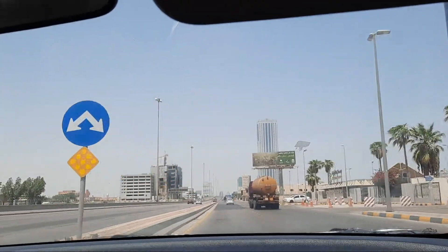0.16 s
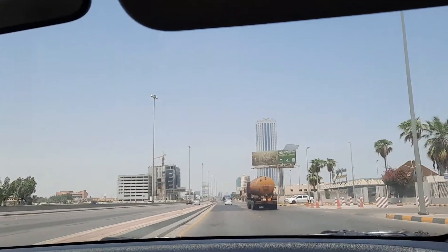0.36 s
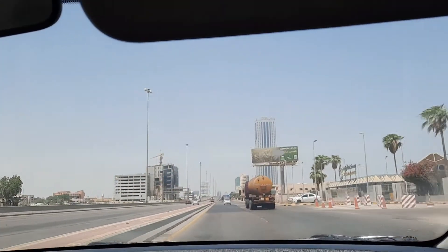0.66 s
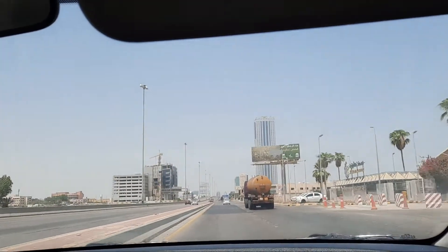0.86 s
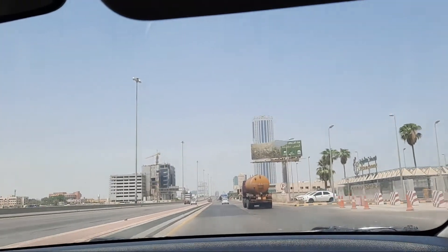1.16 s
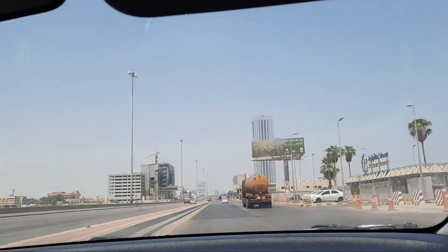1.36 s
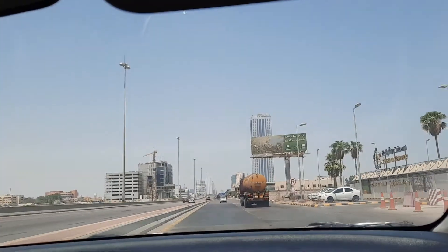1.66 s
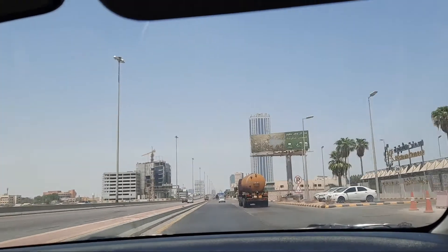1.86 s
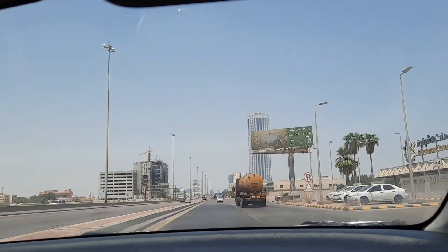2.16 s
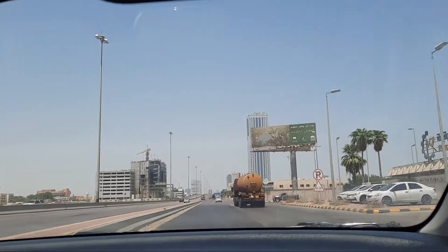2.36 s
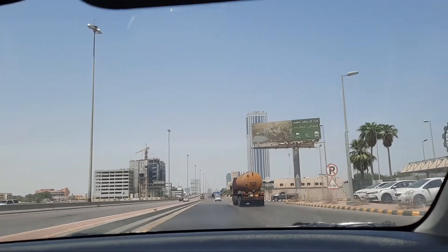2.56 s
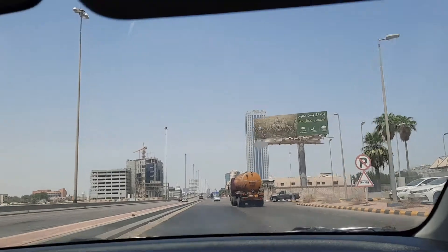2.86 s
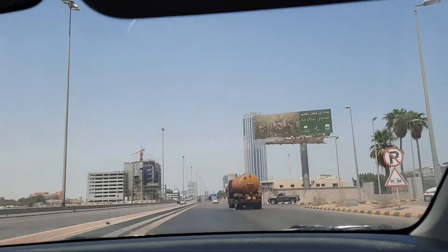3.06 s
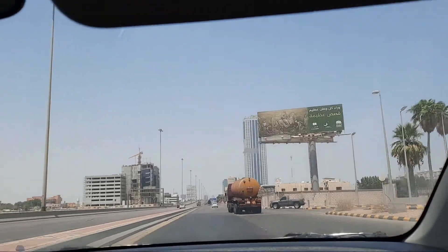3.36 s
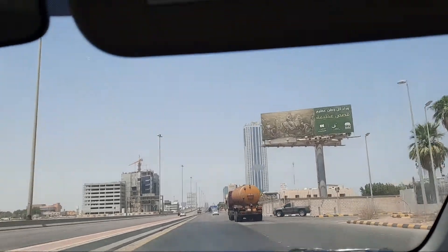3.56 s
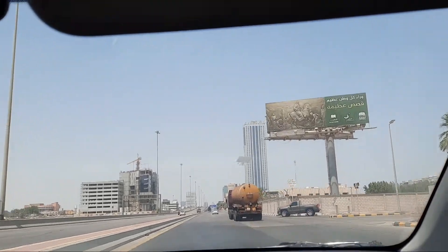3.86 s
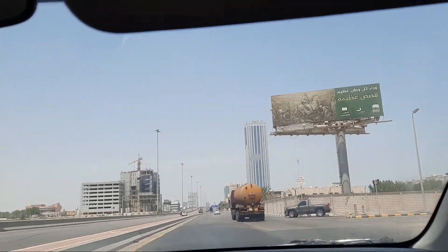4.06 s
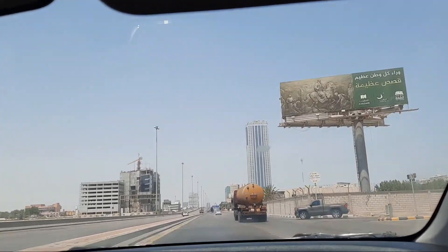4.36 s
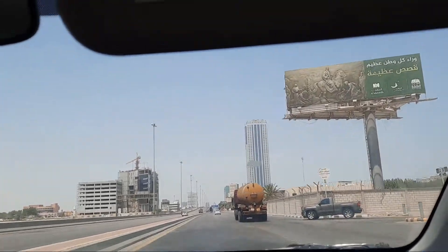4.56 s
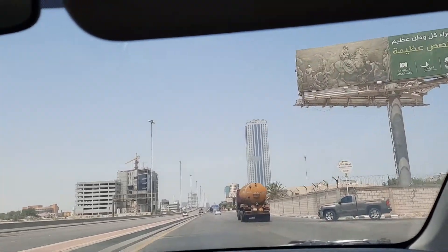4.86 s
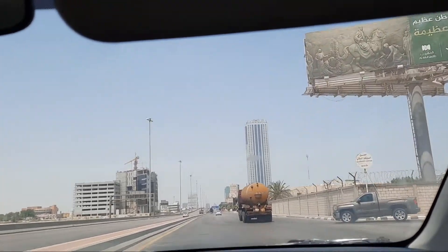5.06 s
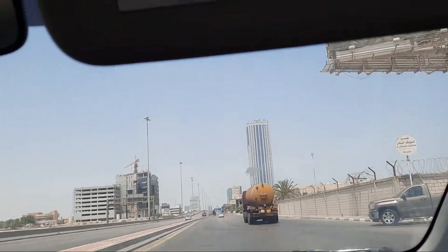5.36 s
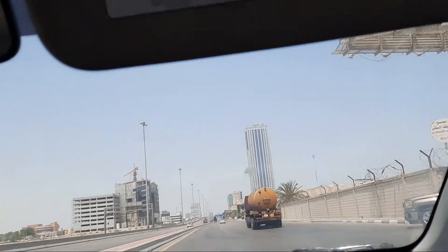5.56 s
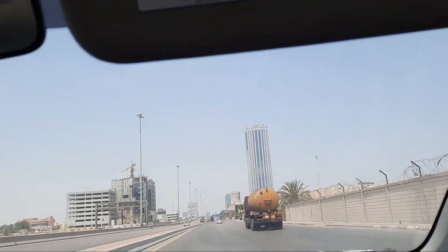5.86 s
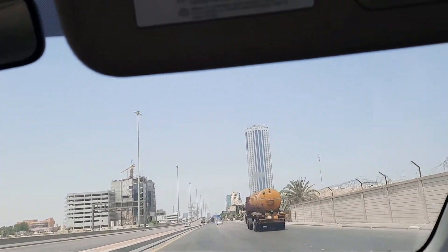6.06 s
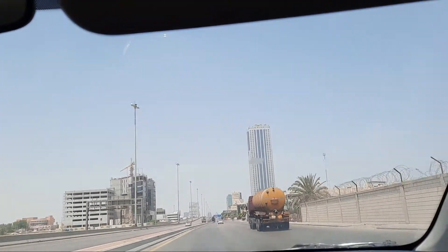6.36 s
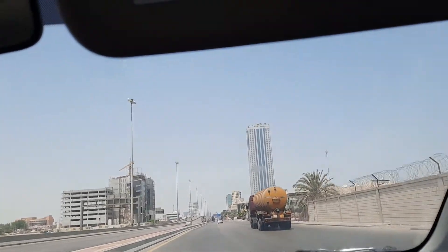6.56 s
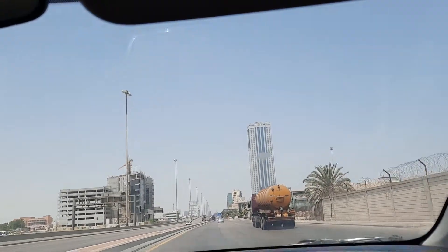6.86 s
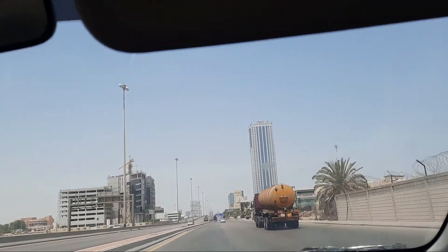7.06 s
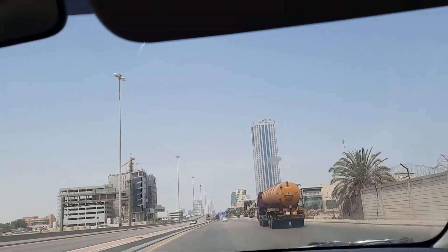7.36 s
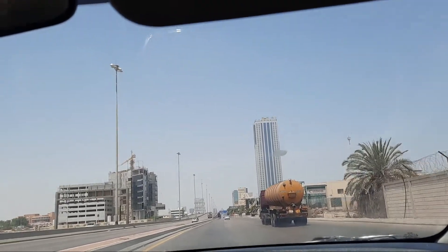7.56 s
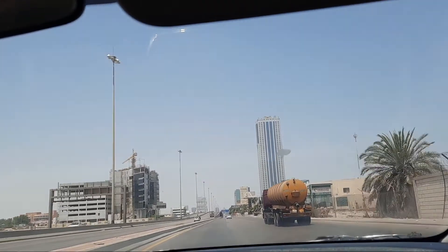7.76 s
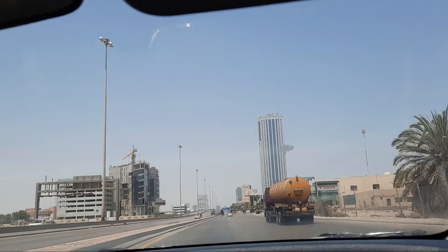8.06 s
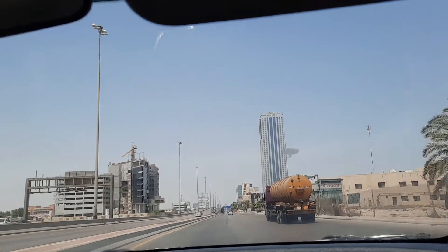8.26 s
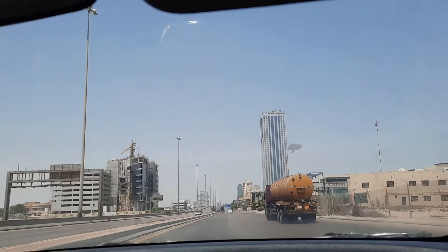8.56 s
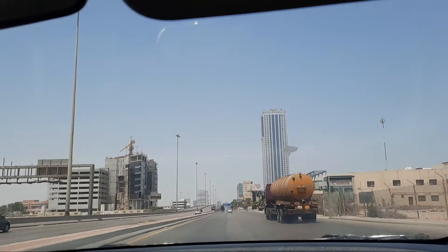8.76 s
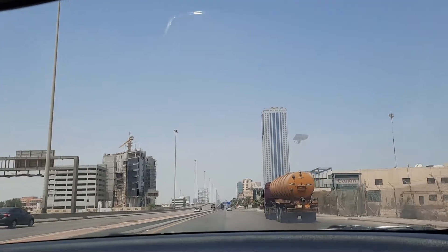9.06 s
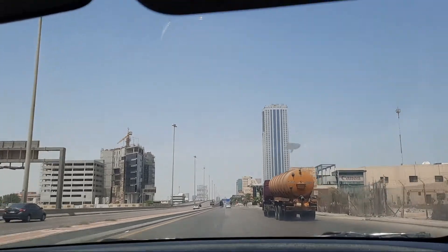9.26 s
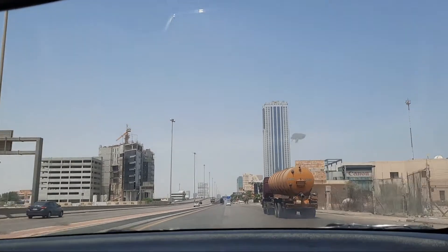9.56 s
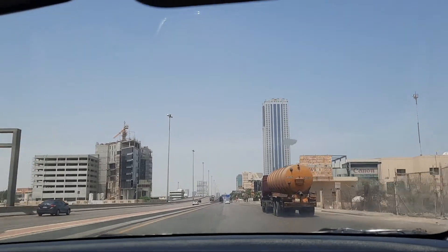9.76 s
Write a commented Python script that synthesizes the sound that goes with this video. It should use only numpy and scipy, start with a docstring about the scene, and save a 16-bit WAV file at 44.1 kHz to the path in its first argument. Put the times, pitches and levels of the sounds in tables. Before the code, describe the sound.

Inside a closed car at highway speed, a steady low rumble and tyre noise swell with bumps, with faint wind hiss.

```python
"""Inside a closed car at steady speed on a highway. From the start the road shakes the body, which booms
at a few low pitches and swells with every bump, while the air inside the tyres hums on and off. Wind
hisses at the door seals, most of all around the middle. After about seven seconds the wheels reach
coarser asphalt and the tread roar steps up; puffs from a vent, rare until then, hit the microphone often."""
import sys
import numpy as np
from scipy import signal
from scipy.fft import rfft, irfft, next_fast_len
from scipy.io import wavfile
from scipy.ndimage import uniform_filter1d, minimum_filter1d

SR = 44100
rng = np.random.default_rng(int(sys.argv[2]) if len(sys.argv) > 2 else 0)


def dump_mix(stems):
    """Bounce the given channels to the path in sys.argv[1] as a 16-bit WAV at rate SR."""
    frames = np.atleast_2d(stems).T  # one column per channel
    limited = np.clip(frames, -1, 1)  # hard clip at full scale
    pcm = np.round(limited * 32767).astype(np.int16)
    wavfile.write(sys.argv[1], SR, pcm)


N = 436590

# The parts that boom: cabin air, engine hum, floor pan, roof panel, subframe, door skin, sidewall,
# boot lid, rim. "Side" is sound that pushes left and right in opposite directions.
# (pitch [Hz], width [Hz], left over right [dB], side level [dB])
BODY_PARTS = [(48.5, 33.5, 0, -22), (72.8, 12, -2.5, -8.5), (101.1, 38, -0.5, -18), (134.9, 13.9, 0.5, -21),
              (185.4, 68, 0, -16.5), (244.8, 16, 3, -11.5), (299.3, 43, -2.5, -10.5),
              (165.5, 18.7, 0.5, -18.5), (332.6, 34, 1.5, -11)]
# How each part follows the road: (level [dB], evenness [0-1], long waves [x], ripples [x], grain [x])
SHAKE_RESPONSE = [(-26, 0.2, 1.06, 0.01, 0.05), (-32, 0.9, 0.31, 0.13, 0), (-22.5, 0.11, 0.46, 0.54, 0.06),
                  (-24.5, 0.74, 0.01, 0.77, 0), (-32.5, 0, 0.01, 0.77, 0.3), (-41.5, 0.5, 0.01, 0.01, 1.1),
                  (-34.5, 0.2, 0.01, 0.01, 1.05), (-36.5, 0.2, 0.01, 0.9, 0.9),
                  (-37, 0.1, 0.01, 0.01, 0.97)]
# Road roughness, used as ups and downs around each average:
# (time [s], long waves [dB], ripples [dB], grain [dB])
ROAD_ROUGHNESS = [(0, -22.5, -24, -25.5), (.15, -26, -23.5, -35), (.35, -34.5, -23.5, -32),
                  (.72, -34.5, -23.5, -37.5), (.78, -29, -19.5, -21.5), (1.0, -34.5, -13, -24),
                  (1.2, -27, -13, -21.5), (1.4, -33, -12.5, -19.5), (1.6, -22, -17, -24.5),
                  (1.75, -31.5, -17, -25.5), (2.0, -27.5, -15.5, -20), (2.3, -23, -12.5, -25.5),
                  (2.62, -25, -15.5, -22.5), (2.7, -27.5, -15, -37.5), (3.0, -19.5, -20.5, -24),
                  (3.3, -19.5, -16, -32.5), (3.6, -19, -14.5, -24.5), (3.9, -18, -18, -31),
                  (4.5, -20.5, -16, -32.5), (5.0, -17, -17.5, -27.5), (5.6, -19.5, -13, -29),
                  (6.08, -22, -15, -27), (6.2, -22, -24.5, -28.5), (6.45, -26, -27, -30),
                  (6.7, -23, -20, -26.5), (7.2, -27, -27.5, -25.5), (7.3, -23, -22, -23.5),
                  (7.6, -24, -21, -27.5), (7.9, -26, -22.5, -23.5), (8.4, -24, -22.5, -24),
                  (8.9, -25.5, -24.5, -25), (9.4, -30.5, -24.5, -22), (9.9, -23.5, -25, -24.5)]
# Swells from bumps and joints: (time [s], half-width [s], cabin air [dB], floor pan [dB], roof [dB])
BUMPS = [(0.005, 0.05, -31, -14, -10), (0.089, 0.055, -18, -19.5, -14.5), (0.954, 0.07, -21.5, -18, -28),
         (1.117, 0.044, -41, -17, -9), (1.372, 0.15, -20, -14, -15.5), (1.55, 0.067, -13, -14.5, -17),
         (1.82, 0.046, -37, -13, -16.5), (2.07, 0.031, -32, -18, -29), (2.2, 0.074, -29, -30, -8.5),
         (2.665, 0.055, -30, -15.5, -24), (2.89, 0.086, -26, -22, -15), (3.442, 0.019, -7, -13, -35),
         (3.873, 0.13, -13, -34, -16), (4.373, 0.047, -36, -24, -13.5), (4.664, .04, -25, -25, -20),
         (4.74, 0.027, -26, -36, -25), (5.1, 0.096, -26, -13.5, -18), (5.34, 0.13, -19, -24, -14.5),
         (5.897, 0.033, -16, -9, -23), (6.026, 0.055, -35, -28, -12.5), (6.397, 0.11, -30, -18, -21.5),
         (6.898, 0.09, -35, -28, -22), (7.19, 0.056, -33, -37, -15), (7.672, 0.052, -35, -21, -37),
         (8.01, 0.11, -28, -17, -25), (8.658, 0.013, -21, -32, -19), (8.908, 0.12, -34, -43, -17),
         (9.746, 0.013, -32, -12, -11)]
# The parts that bumps set ringing: (row of BODY_PARTS [index])
BUMPED_PARTS = [0, 2, 3]
# Tone colours of the tyre and wind noises: (frequency [Hz], relative level [dB])
DRUM_COLOUR = [(15, -43.5), (25, -28), (108, -8.5), (130, -4.5), (153, -4.5), (217, -21.5), (279, -10),
               (321, -13.5), (410, -15.5), (470, -20.5), (522, -21), (626, -30), (700, -30.5), (910, -58),
               (1540, -120)]
RUSH_COLOUR = [(420, -36.5), (590, -5), (660, 4), (760, -0.5), (1000, -8), (1300, -6), (1900, -46.5)]
ROAR_COLOUR = [(350, -37), (600, -9), (690, -17.5), (780, -4), (891, -2.5), (1020, -10), (1140, -6.5),
               (1200, -6), (1290, -15.5), (1500, -12.5), (1950, -44.5), (3300, -120)]
HISS_COLOUR = [(740, -34.5), (1250, -1), (1560, -1), (2090, -4), (2270, -7.5), (2470, -6), (3200, -7.5),
               (4000, -11), (5360, -16.5), (7340, -18.5), (9140, -24.5), (12500, -27.5), (14300, -29.5),
               (15300, -44.5)]
WIND_COLOUR = [(710, -30), (1200, -9.5), (1290, -2.5), (1550, -3), (2300, -7), (2420, -6.5), (3090, -10),
               (3480, -11.5), (7020, -20), (12600, -25.5), (15300, -28.5)]
# Drumming through the floor: (time [s], level [dB])
DRUM_LEVEL = [(0, -37.5), (.72, -38.5), (.77, -35.5), (1.18, -33), (1.4, -31), (2.15, -33.5), (2.7, -36),
              (3.5, -36.5), (4.5, -36.5), (5.54, -36), (6.2, -35.5), (7.0, -34), (7.3, -33), (7.66, -30.5),
              (7.9, -32), (8.8, -31.5), (9.9, -30)]
# Tread on the asphalt, louder where it is coarse: (time [s], roar level [dB], hiss level [dB])
TREAD_LEVEL = [(0, -47, -51), (.72, -45.5, -52.5), (.8, -45, -52.5), (1.3, -44.5, -52), (2.0, -42.5, -56),
               (2.7, -44.5, -54.5), (4.0, -43, -50), (5.2, -42.5, -48), (5.7, -43.5, -52),
               (6.4, -43.5, -48), (7.3, -40, -46.5), (7.36, -40, -42), (7.6, -38, -41.5),
               (7.85, -39, -39.5), (8.05, -42, -42), (8.3, -36, -41), (8.6, -39.5, -41), (8.85, -38, -41.5),
               (9.1, -38, -40.5), (9.4, -37.5, -40), (9.65, -38, -40.5), (9.9, -38, -41)]
# Air ringing inside the tyres: (time [s], level [dB])
TYRE_HUM_LEVEL = [(0.0, -35), (0.72, -45.5), (0.8, -21.5), (1.27, -33.5), (1.9, -25.5), (3.36, -44),
                  (3.53, -40), (3.61, -37), (5.68, -39), (5.76, -29), (6.56, -40), (6.67, -20), (6.7, -44),
                  (7.22, -40), (7.28, -27), (8.63, -35.5), (8.8, -21), (8.88, -35), (9.73, -27),
                  (9.76, -47), (9.87, -32), (9.9, -42)]
# Puffs from the dashboard vent: (time [s], length [s], level [dB])
VENT_PUFFS = [(0.769, 0.073, -27), (1.65, 0.061, -27), (3.69, 0.054, -26), (5.388, .1, -29),
              (5.697, .06, -22), (6.8, 0.076, -23), (7.45, 0.074, -19), (7.7, 0.07, -19),
              (7.85, 0.16, -15.5), (8, 0.04, -13), (8.506, 0.097, -21.5), (8.76, 0.085, -15.5),
              (9.004, 0.2, -23), (9.3, 0.11, -24), (9.573, 0.089, -15.5), (9.714, 0.079, -20),
              (9.86, 0.082, -17)]
# Wind at the door seals: (time [s], level [dB])
WIND_LEVEL = [(0.0, -53), (3.2, -48.5), (5.6, -49.5), (9.9, -60)]
# Echoes between glass and dashboard lift or lower narrow bands: (frequency [Hz], width [Hz], gain [dB])
DASH_ECHOES = [(682, 47, -2), (880, 35, 2.5), (1372, 20, 4), (1790, 20, 2.5), (2080, 45, 4.5),
               (2434, 44, 6), (3100, 68, -4), (4530, 61, 1.5), (4660, 60, -3.5), (4860, 70, 4),
               (5670, 100, 1)]
# Standing waves in the cabin put left and right in or out of step: (frequency [Hz], likeness [-1 to 1])
LIKENESS = [(60, 0.94), (450, 0.85), (530, 1), (630, -0.19), (750, 0.31), (900, 0.74), (1070, 0.78),
            (1270, -0.52), (1520, -0.69), (1810, -0.19), (2150, 0.095), (2700, 0.57), (3400, -0.031),
            (4300, 0.22), (5400, 0.085), (6800, -0.1), (8500, .02)]
# Which side is louder: (frequency [Hz], left over right [dB])
BALANCE = [(35, 0), (60, -2.5), (110, 3.5), (200, 0), (380, 2), (690, 2), (1280, 1), (2360, 0.0),
           (4360, -1.5), (8040, 0.5), (14800, -1.5)]
# How far the left microphone runs ahead of the right: (frequency [Hz], phase lead [radians])
LEFT_LEADS = [(60, .22), (450, .12), (1100, .3), (1400, -.22), (1750, 0.05), (2200, .7), (2750, .95),
              (3450, 2.3), (4300, 2.7), (5400, 4.8), (6800, 7.5)]


def body_boom(road_db):
    """The rough road shakes each part of the car at its own pitch, and bumps add short swells."""
    out, t = np.zeros((2, N)), np.arange(N) / SR
    wander_db = 1.6   # each part also swells and sinks by chance
    gains = [from_db(db + np.dot(shares, road_db) + wander_db * drift(3.3))
             for db, _, *shares in SHAKE_RESPONSE]
    for time, half_width, *swell_db in BUMPS:
        near = slice(max(int((time - 3 * half_width) * SR), 0), int((time + 3 * half_width) * SR))
        swell = np.exp(-((t[near] - time) / half_width) ** 2)
        for part, db in zip(BUMPED_PARTS, swell_db):
            gains[part][near] = np.hypot(gains[part][near], from_db(db) * swell)   # powers add
    for (hz, width_hz, lean_db, side_db), (_, evenness, *_), gain in zip(BODY_PARTS, SHAKE_RESPONSE, gains):
        out += gain * stereo_ring(hz, width_hz, evenness, lean_db, side_db)
    return out


def rolling_tyres(grain_db):
    """Tyres drum through the floor, rush over coarse stone, and roar and hiss through the glass."""
    drum_db, = in_time(DRUM_LEVEL)
    roar_db, hiss_db = in_time(TREAD_LEVEL)
    rush_db = -51 + .43 * grain_db + 1.01 * (hiss_db - hiss_db.mean())
    drum = from_db(drum_db) * cabin_noise(DRUM_COLOUR, (360, 600), flicker_db=.68)
    rush = from_db(rush_db) * cabin_noise(RUSH_COLOUR, (550, 1300), flicker_db=.6)
    roar = from_db(roar_db) * cabin_noise(ROAR_COLOUR, (700, 1300), flicker_db=.8)
    hiss = from_db(hiss_db) * cabin_noise(HISS_COLOUR, (1500, 6000), flicker_db=.45)
    return drum + rush + roar + hiss


def tyre_hum():
    """The air inside the tyres rings at one pitch, coming and going with the road surface."""
    level_db, = in_time(TYRE_HUM_LEVEL)
    return from_db(level_db) * stereo_ring(hz=266.3, width_hz=11.3, evenness=.32, lean_db=3.5, side_db=-7.5)


def vent_draught():
    """Puffs of air hit each microphone with its own low rumble, weaker on the right."""
    t = np.arange(N) / SR
    puffs = sum(from_db(db) * np.exp(-2 * ((t - time) / length) ** 2) for time, length, db in VENT_PUFFS)
    low_band = signal.butter(2, (50, 160), "band", fs=SR, output="sos")
    rumble = signal.sosfilt(low_band, rng.standard_normal((2, N)))
    return puffs * rms_one(rumble) * from_db([[0], [-6]])


def wind():
    """Air streaming past the door seals makes a smooth hiss that flutters slightly."""
    level_db, = in_time(WIND_LEVEL)
    return from_db(level_db) * cabin_noise(WIND_COLOUR, (1200, 15000), flicker_db=.6)


def ring(hz, width_hz, evenness):
    """A part shaken at random gives a wavering tone; more evenness makes its loudness steadier."""
    step, warm_up = 20, 2000   # the swing is worked out once every 20 samples
    count = N // step + warm_up + 2
    memory = np.exp(-step * np.pi * width_hz / SR)
    swing = rng.standard_normal(count) + 1j * rng.standard_normal(count)
    for _ in range(3):
        swing = signal.lfilter([1 - memory], [1, -memory], swing)
    swing = swing[warm_up:]
    strength = np.sqrt(rms_one(np.abs(swing)) ** 2 + .05)
    swing = np.interp(np.arange(N) / step, np.arange(len(swing)), swing / strength ** evenness)
    tone = np.exp(2j * np.pi * hz * np.arange(N) / SR)
    return rms_one(np.real(swing * tone))


def stereo_ring(hz, width_hz, evenness, lean_db, side_db):
    """Both microphones hear nearly the same ringing; a positive lean makes the left louder."""
    shared = ring(hz, width_hz, evenness)
    side = from_db(side_db) * ring(hz, width_hz, evenness=0)
    return from_db([[lean_db / 2], [-lean_db / 2]]) * (shared + side * [[1], [-1]])


def cabin_noise(colour, band_hz, flicker_db):
    """Flickering noise shaped by the cabin, with its level set by the part inside band_hz."""
    size = next_fast_len(N)
    hz = np.maximum(np.arange(size // 2 + 1) * SR / size, 1)
    echo_db = sum(db / (1 + (2 * (hz - centre) / width) ** 2) for centre, width, db in DASH_ECHOES)
    shared, side = rfft(rng.standard_normal((2, size))) * from_db(at_hz(colour, hz) + echo_db)
    alike = at_hz(LIKENESS, hz)
    lean = from_db(at_hz(BALANCE, hz) / 2 * np.array([[1], [-1]]))
    pair = lean * (np.sqrt(1 + alike) * shared + np.sqrt(1 - alike) * side * [[1], [-1]])
    in_band = (hz > band_hz[0]) & (hz < band_hz[1])
    pair /= np.std(irfft(pair.mean(axis=0) * in_band, size))
    # odd and even octaves share a slow flicker, and each set has a fast one of its own
    octave_angle = np.pi / 2 * np.log2(hz)
    slow_flicker = 1.7 * drift(5)
    return sum(from_db(flicker_db * (slow_flicker + drift(23))) * irfft(pair * share ** 2, size)[:, :N]
               for share in (np.sin(octave_angle), np.cos(octave_angle)))


def drift(rate_hz):
    """A smooth random wobble with a typical size of 1."""
    step, warm_up = 40, 2000   # one random value every 40 samples
    memory = np.exp(-2 * step * np.pi * rate_hz / SR)
    noise = rng.standard_normal(N // step + warm_up + 2)
    smooth = signal.lfilter([1], [1, -2 * memory, memory * memory], noise)[warm_up:]
    return np.interp(np.arange(N) / step, np.arange(len(smooth)), rms_one(smooth))


def from_db(db):
    """Turn decibels into a number to multiply by."""
    return 10 ** (np.asarray(db) / 20)


def rms_one(x):
    """Scale a signal so that its typical size (rms) is 1."""
    return x / np.sqrt(np.mean(x ** 2) + 1e-20)


def in_time(rows):
    """Join the rows of a time table with straight lines, giving one curve per level column."""
    times, *columns = np.transpose(rows)
    return [np.interp(np.arange(N) / SR, times, column) for column in columns]


def at_hz(rows, hz):
    """Look up frequencies in a table, with the octaves evenly spaced."""
    frequencies, values = np.transpose(rows)
    return np.interp(np.log(hz), np.log(frequencies), values)


def scene():
    """Add up everything heard in the cabin."""
    road_db = np.array(in_time(ROAD_ROUGHNESS))
    road_db -= road_db.mean(axis=1, keepdims=True)
    return body_boom(road_db) + tyre_hum() + rolling_tyres(road_db[-1]) + wind() + vent_draught()


def record(dry):
    """Small microphones lose the deepest bass; a limiter turns down big peaks; the top treble is cut."""
    fade_in_s, release_db_per_s, top_hz = .002, 60, 15430
    sound = dry * np.sin(np.pi / 2 * np.minimum(np.arange(N) / (fade_in_s * SR), 1)) ** 2
    sound = signal.sosfilt(signal.butter(6, 36, "high", fs=SR, output="sos"), sound)
    # the two microphones are out of step
    size = next_fast_len(N + SR)
    hz = np.maximum(np.arange(size // 2 + 1) * SR / size, 1)
    phase_shift = np.exp(.5j * at_hz(LEFT_LEADS, hz) * [[1], [-1]])
    sound = irfft(rfft(sound, size) * phase_shift, size)[:, :N]
    # the limiter dips just before any peak above full scale, then lets go slowly
    over_db = np.maximum(20 * np.log10(np.abs(sound).max(axis=0) + 1e-9), 0)
    release_db = release_db_per_s * np.arange(N) / SR
    gain_db = minimum_filter1d(release_db - np.maximum.accumulate(over_db + release_db), size=257)
    gain_db = uniform_filter1d(uniform_filter1d(gain_db, size=129), size=129)
    treble_cut = signal.ellip(12, .3, 95, top_hz, fs=SR, output="sos")
    return signal.sosfilt(treble_cut, sound * from_db(gain_db))


dry = scene()
out = record(dry)
dump_mix(out)
```